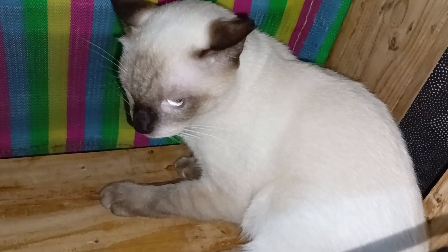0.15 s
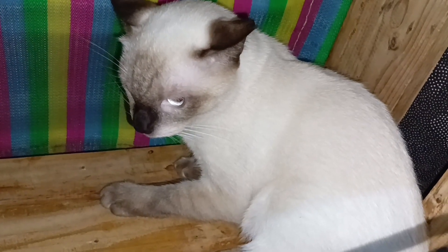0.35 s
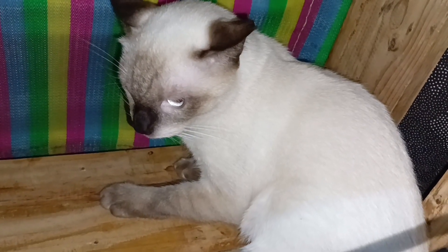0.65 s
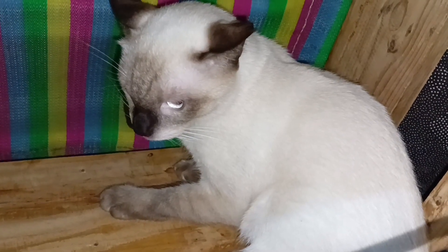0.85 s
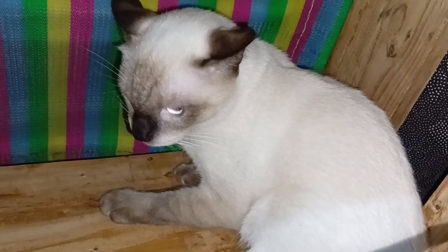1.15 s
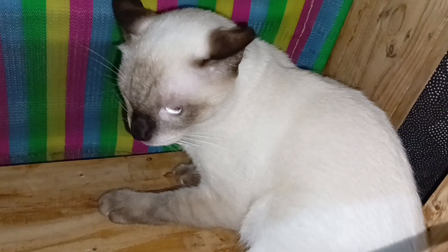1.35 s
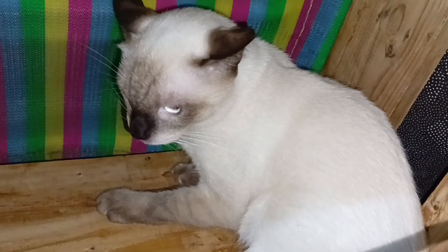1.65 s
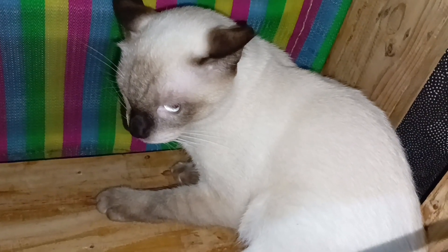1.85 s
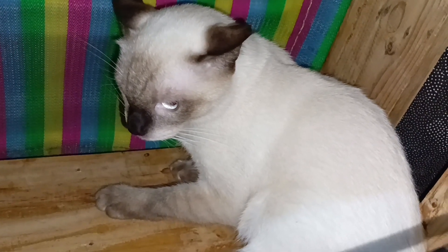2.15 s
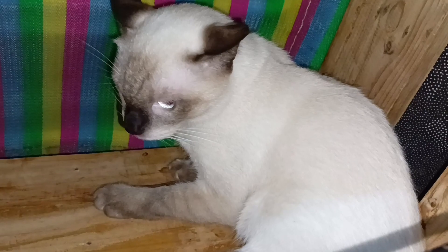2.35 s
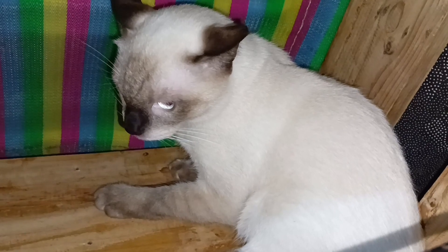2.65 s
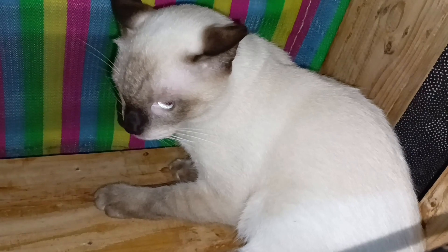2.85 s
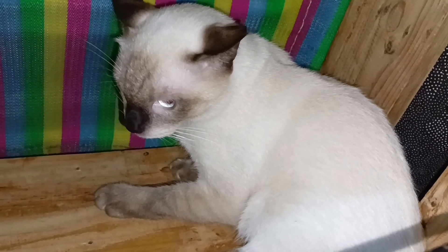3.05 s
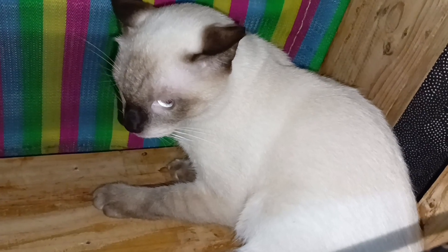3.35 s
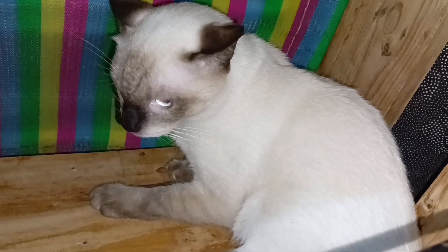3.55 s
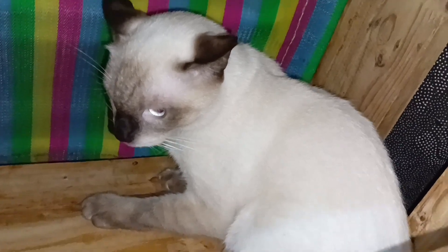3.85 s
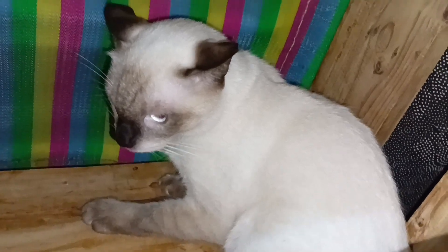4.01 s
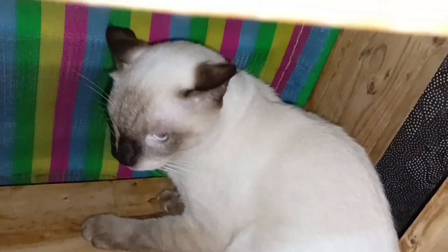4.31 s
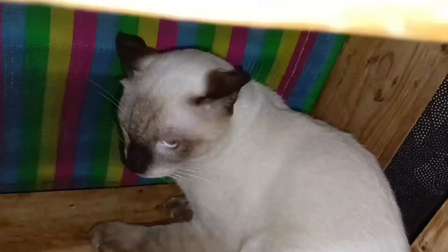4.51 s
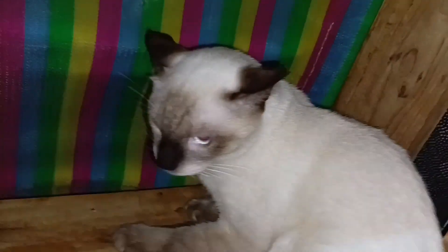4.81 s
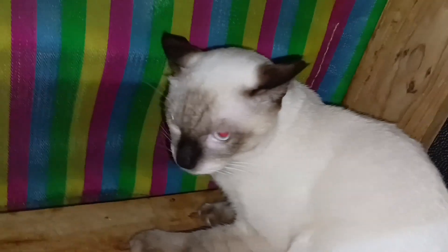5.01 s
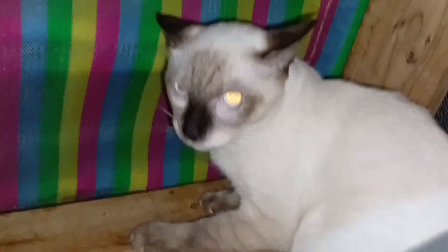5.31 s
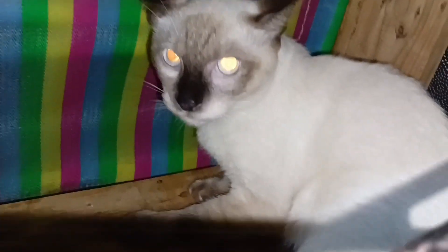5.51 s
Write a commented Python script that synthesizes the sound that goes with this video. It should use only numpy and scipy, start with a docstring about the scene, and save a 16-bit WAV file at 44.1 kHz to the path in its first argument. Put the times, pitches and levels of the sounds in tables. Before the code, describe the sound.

A quiet indoor space with a steady low hum and dull room noise; faint, blurred bird chirps far away. Small dry ticks of mouth, fur and wood are scattered throughout. From about 0.3 s a cat close to the microphone makes a low fluttering grumble. Between 0.55 and 1.1 s a brief, uneven, rasping hiss spits past the teeth, with a soft padded thump on wood at its start. At 1.1 s a long throaty growl begins, dark and buzzing, swelling fast, rising slightly until about 2.3 s, then sinking and stopping near 2.9 s. Hoarse distant squawks come between 1.5 and 4 s. The pause holds only room, birds and small knocks around 3.7-3.8 s. At 4.6 s a rougher, rattling, breathy growl starts, a sharp click at 4.8 s, and it climbs steeply, getting clearer and louder, into a yowl by 5.6 s.

```python
"""A wooden bench in a humming room, with an angry cat close to the microphone and birds far off.
A low grumble (a fluttering sine), a hiss (coloured noise) and a soft thump (bench modes) come first.
Then a long growl, and a shorter one that rattles and climbs into a yowl: both are uneven harmonics
of the vocal folds with random pulses and breath noise. Noise bursts make the ticks of mouth and bench;
the birds are hoarse resonant squawks and gliding sines."""
import sys
import numpy as np
from scipy import signal
from scipy.fft import rfft, irfft
from scipy.io import wavfile

SR = 44100
rng = np.random.default_rng(int(sys.argv[2]) if len(sys.argv) > 2 else 0)


def transcribe(signal):
    """Save signal, clipped to [-1, 1], as a 16-bit WAV file at the path in sys.argv[1]."""
    frames = np.atleast_2d(signal).T
    limited = np.clip(frames, -1, 1)
    pcm = np.round(limited * 32767).astype(np.int16)
    wavfile.write(sys.argv[1], SR, pcm)


N = 250047

# room background colour: (frequency [Hz], relative level [dB per Hz])
ROOM_COLOUR = [(18, -62), (30, -20.5), (108, 2.5), (163, -18), (191, -10), (407, -16.5), (502, -16.5),
               (557, -18.5), (802, -20.5), (989, -21.5), (1100, -23), (2050, -25), (3740, -35.5),
               (5670, -37), (15300, -50)]
# harsh distant bird calls, level before the birds' common boost: (time [s], length [s], level [dB],
# base pitch [Hz], main resonance [Hz], low resonance before a 1.5 dB lift [dB], hoarseness [0-1])
SQUAWKS = [(1.467, 0.119, -40, 917, 1850, -14, 0.39), (2.316, 0.068, -40, 723, 2080, -4, 0.77),
           (2.791, 0.098, -41, 782, 2077, -2, 0.72), (3.218, .11, -50, 801, 2230, 1.5, 0.69),
           (3.558, .037, -63, 754, 2300, -6, 0.4), (3.611, 0.041, -55.5, 808, 2320, -5, .4),
           (3.935, 0.034, -56.5, 660, 2000, -14, 0.9)]
# thin distant bird notes, level before the birds' common boost:
# (time [s], length [s], level [dB], middle pitch [Hz], glide [factor, above 0 up, below 0 down])
CHIRPS = [(0, 0.097, -63, 6140, -1.03), (1.796, 0.095, -52.5, 4507, 0.87), (1.84, .13, -54.5, 6150, -0.96),
          (2.351, 0.144, -49, 6040, 0.81), (3.08, .24, -62, 5760, -0.88), (3.068, .14, -67, 4950, 0.94),
          (3.759, .2, -65, 5600, 0.94), (4.428, 0.066, -63.5, 4400, 1), (4.456, 0.12, -63, 5880, -1.3)]
# ticks and scuffs of mouth and bench, played 10 dB below the listed level:
# (time [s], level [dB], centre [Hz], width [octaves], rise [s], t60 [s])
TICKS = [(0.207, -36.5, 3240, 1.4, .005, 0.043), (.245, -37.5, 7250, 0.66, .001, .03),
         (0.355, -42.5, 3700, .9, 0.0076, 0.25), (.51, -30, 4970, 0.73, .0006, 0.0082),
         (.56, -29, 1210, 0.47, .008, 0.14), (.565, -38.5, 5300, .2, .007, .031),
         (.763, -29.5, 4120, .2, .001, .028), (.788, -30, 8260, .45, .001, .03),
         (.82, -35, 6000, .57, .0035, .053), (.845, -30, 3970, 0.21, .002, 0.026),
         (.903, -25.5, 920, 0.96, .012, .15), (1.245, -25.5, 10100, 1.2, .004, 0.11),
         (1.48, -26.5, 4800, 1.5, 0.0048, 0.13), (2.37, -27.5, 7900, 1.3, 0.0034, .041),
         (3.705, -26.5, 1190, 1.45, .001, 0.015), (3.768, -33.5, 1200, 1.6, 0.0017, 0.11),
         (3.81, -24.5, 119, 0.14, .012, 0.089), (4.144, -35, 4300, 2.1, 0.0025, 0.058),
         (4.332, -33.5, 350, 0.62, 0.0014, 0.031), (4.822, -25, 7300, 0.28, .002, .037),
         (4.827, -16.5, 2550, 1.15, 0.0018, .028), (5.092, -23, 4474, 0.96, 0.004, .03)]
# low grumble before the first growl, played 0.5 dB above the listed level: (time [s], level [dB])
GRUMBLE = [(0.25, -63), (0.276, -51), (0.534, -37), (0.646, -30), (0.796, -37.5), (1.12, -33.5)]
# the hiss, before the trims in hiss(): (time [s], throat noise [dB], noise at the teeth [dB])
HISS = [(0.53, -71, -65), (0.56, -50, -59), (0.568, -43, -52), (0.634, -45.5, -54.5), (0.758, -48.5, -64),
        (0.762, -50, -55), (0.826, -42, -48.5), (0.878, -46, -57), (0.914, -43.5, -47.5),
        (1.04, -45, -43.5), (1.07, -50, -58), (1.12, -53, -62)]
# colour of the hiss: (frequency [Hz], relative level [dB per Hz])
HISS_COLOUR = [(180, -1.5), (300, -11.5), (378, 0), (460, -3.5), (560, -10), (694, -7), (818, -9),
               (1100, -9.5), (1580, -14.5), (1830, -13.5), (3540, -19.5), (4240, -18), (5250, -23.5),
               (10800, -30.5), (15300, -34)]
# resonances of the open mouth in the hiss: (frequency [Hz], width [Hz], added gain [dB])
JAWS = [(4400, 340, -10), (7300, 1300, -3), (12600, 2300, 3)]
# modes of the bench under the thump, played 10 dB below the listed level:
# (frequency [Hz], level [dB], rise [s], t60 [s])
BENCH = [(215, -11.5, 0.056, 0.108), (435, -16.5, 0.029, 0.045), (625, -20, 0.0025, 0.1),
         (1063, -29.5, 0.024, 0.14), (1342, -31, 0.019, 0.1), (1610, -51, 0.023, .09)]
# passing whistles of nose and mouth:
# (time [s], length [s], level [dB], start [Hz], end [Hz], width [Hz])
WHISTLES = [(4.48, 0.18, -58, 1900, 1600, 59), (4.78, 0.35, -44, 7600, 6990, 1700),
            (4.74, 1.3, -47, 1700, 1740, 70), (0.918, 0.15, -50, 4130, 4400, 320)]
# the two calls: (time [s], pitch [Hz], effort [dB])
GROWL = [(1.1, 119.2, -35.5), (1.18, 127.5, -20), (1.458, 143.2, -13.5), (1.56, 153.1, -11),
         (1.626, 156.4, -12), (1.656, 154.5, -12.5), (1.794, 166.7, -14.5), (2.022, 173.2, -16),
         (2.164, 173, -16), (2.214, 175.6, -16), (2.33, 177.1, -18), (2.402, 170.8, -15.5),
         (2.432, 163.9, -17.5), (2.574, 152.3, -15), (2.696, 140.6, -17), (2.818, 137.9, -17),
         (2.884, 127.3, -19.5), (2.92, 124.3, -38.5)]
YOWL = [(4.59, 155.8, -47), (4.642, 153.9, -25), (4.73, 173.8, -26.5), (4.792, 172.6, -21),
        (4.822, 177.1, -23.5), (4.95, 177.5, -19), (5.116, 204, -17.5), (5.242, 214.6, -10.5),
        (5.302, 229.2, -9), (5.448, 249.3, -9), (5.536, 286.1, -11.5), (5.6, 360.3, -14),
        (5.63, 368.3, -21), (5.66, 349.2, -12)]
# state of the vocal folds; pressing weakens the fundamental: (time [s], roughness [0-1], press [dB])
GROWL_FOLDS = [(1.24, 0.11, -4.5), (1.31, .11, 1), (1.479, 0.25, -0.5), (1.619, .18, -1), (2.299, 0.27, 2),
               (2.55, .18, 1.5), (2.791, 0.21, 3.5), (2.869, .24, 10.5)]
YOWL_FOLDS = [(4.65, 0.23, -4), (4.72, 0.29, -1), (4.82, .54, 2), (4.959, .44, 8), (5.12, 0.44, 1.5),
              (5.3, .15, 0), (5.601, 0.084, 0.5)]
# throat response, sharing the effort between the two lowest harmonics: (frequency [Hz], gain [dB])
GROWL_THROAT = [(125, 1), (152, 0.5), (175, -8.5), (250, -3), (278, 1), (350, -2)]
YOWL_THROAT = [(150, 1.5), (180, 2.5), (245, -6), (300, 3), (360, -5), (490, -10.5), (570, -5), (720, -17)]
# colour of the overtones of each call: (frequency [Hz], relative level [dB])
GROWL_OVERTONES = [(380, -4), (450, -7), (530, -3), (610, -12), (700, -6.5), (860, -21), (1020, -44),
                   (1240, -20), (1500, -38)]
YOWL_OVERTONES = [(450, 7), (530, 15.5), (600, -8), (700, 0.5), (790, -5), (900, -10), (1050, -11.5),
                  (1230, -5.5), (1450, -13.5), (1800, -45)]
# colour of the uneven pulses: (frequency [Hz], relative level [dB])
RATTLE = [(40, -35), (70, -17), (110, -12.5), (155, -11.5), (230, 5.5), (350, 2.5), (430, -23), (540, 2.5),
          (620, -23.5), (740, -7), (950, -33.5), (1500, -71)]
# air through the nearly shut mouth: (frequency [Hz], relative level [dB per Hz])
GROWL_AIR = [(530, -22), (900, -7.5), (1030, -3), (1220, -6.5), (1550, -8), (2090, -10), (2650, -5.5),
             (3430, -16), (3820, -9.5), (4670, -18.5), (6750, -18.5), (7870, -19.5), (10600, -26.5),
             (12600, -16), (15300, -26.5)]
YOWL_AIR = [(530, -56), (900, 6), (1050, -12), (1210, -8), (1430, -10), (1830, -4), (2060, -9.5),
            (2620, -7), (3350, -14), (3600, -14), (5850, -19.5), (7690, -21), (10500, -30), (12400, -17.5),
            (15300, -31)]
# narrow resonances of mouth and nose: (frequency [Hz], width [Hz], added gain [dB])
NOSE = [(1240, 63, 6.5), (1812, 27, -1), (2760, 310, -9), (3680, 100, -15.5), (5370, 170, -2.5),
        (6670, 170, 2.5)]

TIME = np.arange(N) / SR
BINS = np.fft.rfftfreq(N, 1 / SR)
ROOM_DB, HUM_DB, HUM_HZ = -47, -51, 115.4
# birds too far to tell apart; level before the birds' common boost
FAR_NOTES_PER_S, FAR_NOTE_DB, FAR_NOTE_S = 8.8, -81.5, .17
FAR_LOW_HZ, FAR_HIGH_HZ = 2800, 7400
SQUAWK_WIDTH_HZ = 1100  # width of the main resonance in a fully hoarse call
CHIRP_GLIDE = 0.066  # share of its pitch that a note slides when its glide factor is 1
FIDGETS_PER_S, FIDGET_DB, FIDGET_T60_S = 14, -58, .03  # average rate; each level varies at random
GRUMBLE_HZ = 99.5
TREBLE_HZ = 3400  # hiss below this comes from the throat, above it from the teeth
THUMP_S = .55
EASY_HZ = 154.2  # a relaxed pitch; above it the folds tighten and the jaw opens
FULL_DB = -14  # the effort of a full growl
# the whistle at the teeth sinks as the jaw opens
TEETH_HZ, TEETH_WIDTH_HZ, TEETH_SAG_HZ_PER_OCTAVE = 12360, 560, 1150
TEETH_SWELL_DB = 17  # how far that whistle rises from the ends of a call to its middle
MIC_LOW_HZ = 48  # the small microphone loses the deep bass
EDGE_HZ = 15550  # upper band limit


def amp(db):
    """Decibels to gain."""
    return 10 ** (np.asarray(db) / 20)


def unit(x):
    """Scales to rms 1."""
    return x / np.sqrt(np.mean(x ** 2) + 1e-20)


def read(points, hz):
    """Gain of a short spectrum at any frequency, drawn straight over log frequency."""
    f, db = np.transpose(points)
    return amp(np.interp(np.log(hz + 1), np.log(f + 1), db))


def curves(rows):
    """A soft gate over the span of a table and just past it, then its columns at every sample."""
    s, *columns = np.transpose(rows)
    inside = np.minimum(TIME - s[0], s[-1] + .025 - TIME)
    gate = np.clip(inside / .008, 0, 1)
    return [gate] + [np.interp(TIME, s, c) for c in columns]


def colour(x, gain):
    """Filters by a gain per frequency; rms 1."""
    return unit(irfft(rfft(x) * gain, N))


def noise():
    """White noise."""
    return rng.standard_normal(N)


def wander(hz):
    """Smooth random drift with speeds up to about hz; rms 1."""
    return colour(noise(), 1 / (1 + (BINS / hz) ** 4))


def resonate(x, hz, width):
    """A resonance of gain 1 that follows the curve hz."""
    turn = np.exp(2j * np.pi * np.cumsum(hz * np.ones(N)) / SR)
    r = np.exp(-np.pi * abs(width) / SR)
    # shift the band down to zero, smooth it there, shift it back
    smooth = signal.lfilter([1 - r], [1, -r], x / turn + 1e-18)
    return 2 * (turn * smooth).real


def whistle(hz, width):
    """A narrow band of air noise, resonated twice; rms 1."""
    return unit(resonate(resonate(noise(), hz, width), hz, width))


def peaks(rows, hz):
    """Summed gain of bell-shaped resonances (frequency [Hz], width [Hz], gain [dB])."""
    return sum(amp(db) / (1 + (2 * (hz - f) / width) ** 2) for f, width, db in rows)


def causal(gain):
    """The same gains with the phase lag of a real resonator: it rings after the blow."""
    log_gain = np.log(np.r_[gain, gain[:0:-1]])
    return np.exp(np.conj(signal.hilbert(log_gain)))[:len(gain)]


def add(mix, s, sound):
    """Mixes a sound in at time s."""
    part = mix[max(0, round(s * SR)):][:len(sound)]
    part += sound[:len(part)]


def echoes(x, t60):
    """A diffuse noise tail of energy 1 after a 4 ms gap."""
    t = TIME[:SR // 2]
    tail = rng.standard_normal(len(t)) * amp(-60 * t / t60) * (t > .004)
    return signal.fftconvolve(x, tail / np.linalg.norm(tail))[:N]


def boards(x):
    """Reflections off the boards close by ripple the treble."""
    out = x.copy()
    for delay_s, db in [(.0007, -22), (.0019, -33), (.0043, -16.5)]:
        add(out, delay_s, amp(db) * x)
    return out


def room():
    """Steady coloured noise with a low hum made of narrow-band noise."""
    background = colour(noise(), read(ROOM_COLOUR, BINS))
    return amp(ROOM_DB) * background + amp(HUM_DB) * whistle(HUM_HZ, 22)


def chorus():
    """Very faint gliding bird notes at random times and pitches."""
    out = np.zeros(N)
    u = np.linspace(0, 1, int(FAR_NOTE_S * SR))
    warble = wander(300)
    for when, height, slope in rng.random((int(FAR_NOTES_PER_S * N / SR), 3)):
        start = int(when * (N - len(u)))
        bend = 1 + CHIRP_GLIDE * (slope - .5) * u + 0.026 * warble[start:][:len(u)]
        hz = FAR_LOW_HZ * (FAR_HIGH_HZ / FAR_LOW_HZ) ** height * bend
        note = np.sin(np.pi * u) * np.sin(2 * np.pi * np.cumsum(hz) / SR)
        add(out, when * N / SR, amp(FAR_NOTE_DB) * note)
    return out


def chirps():
    """Thin whistled notes: a wavering sine glides while it swells and fades."""
    out = np.zeros(N)
    for s, length, db, pitch, glide in CHIRPS:
        u = np.linspace(0, 1, int(length * SR))
        hz = pitch * (1 + glide * CHIRP_GLIDE * (u - .5)) * (1 + 0.028 * wander(360)[:len(u)])
        add(out, s, amp(db) * np.sin(np.pi * u) * np.sin(2 * np.pi * np.cumsum(hz) / SR))
    return out


def squawks():
    """Hoarse calls: unsteady harmonics and noise pass three throat resonances."""
    out = np.zeros(N)
    for s, length, db, pitch, peak, low_db, hoarse in SQUAWKS:
        u = np.linspace(0, 1, int(length * SR))
        bins = np.fft.rfftfreq(len(u), 1 / SR)
        hz = pitch * (1 + 0.0478 * wander(210)[:len(u)] + 0.0274 * np.sin(np.pi * u))
        phase = 2 * np.pi * np.cumsum(hz) / SR
        buzz = unit(sum(np.sin(k * phase) for k in range(1, 8)))
        drive = (1 - hoarse) * buzz + hoarse * rng.standard_normal(len(u))
        throat = [(840, 230, low_db + 1.5), (peak, hoarse * SQUAWK_WIDTH_HZ, 0), (3900, 1800, -15)]
        call = irfft(rfft(drive) * peaks(throat, bins), len(u))
        fade = signal.windows.tukey(len(u), .5) * amp(-5 * u)
        add(out, s, amp(db) * unit(call * fade))
    return out


def birds():
    """All bird calls, blurred by distance with a diffuse tail."""
    out = chorus() + chirps() + squawks()
    return amp(4.0) * out + amp(3.5) * echoes(out, t60=0.3)


def fidgets():
    """Tiny dry ticks of fur and claws on wood: random clicks, each a short decaying noise."""
    clicks = (rng.random(N) < FIDGETS_PER_S / SR) * amp(3 * rng.standard_normal(N))
    t = TIME[:SR // 10]
    ring = rng.standard_normal(len(t)) * amp(-60 * t / FIDGET_T60_S)
    return amp(FIDGET_DB) * signal.fftconvolve(clicks, ring)[:N]


def ticks():
    """Short dying noise bursts of mouth and bench, each in its own band."""
    t, out = TIME[:4096], np.zeros(N)  # every burst ends within 93 ms
    hz = np.fft.rfftfreq(len(t), 1 / SR) + 1
    for s, db, centre, octaves, rise, t60 in TICKS:
        band = 1 / (1 + (np.log2(hz / centre) / octaves) ** 2) ** 2
        burst = unit(irfft(rfft(rng.standard_normal(len(t))) * band))
        decay = amp(db - 10 - 60 * np.maximum(t - rise, 0) / t60)
        add(out, s, burst * np.minimum(t / rise, 1) * decay)
    return out


def grumble():
    """A low, nearly pure flutter in the closed throat: a sine of wandering strength."""
    gate, db = curves(GRUMBLE)
    flutter = np.sin(2 * np.pi * GRUMBLE_HZ * TIME) * (1 + 0.41 * wander(40))
    return gate * amp(db + 0.5) * unit(flutter)


def hiss():
    """Air rasps in the throat and spits past the teeth."""
    gate, throat_db, teeth_db = curves(HISS)
    shape = read(HISS_COLOUR, BINS) * (1 + peaks(JAWS, BINS))
    high = 1 / (1 + (TREBLE_HZ / (BINS + 1)) ** 8)
    throat = amp(throat_db + 1.5) * colour(noise(), shape * (1 - high))
    spit = 9 * noise() * (rng.random(N) < 200 / SR)  # tiny pops of saliva, about 200 a second
    teeth = amp(teeth_db - 2.0) * colour(noise() + spit, shape * high)
    return boards(gate * (throat + teeth) * amp(1.9 * wander(150)))


def thump():
    """A padded blow: the bench's modes swell and die."""
    t, out = TIME[:SR // 3], np.zeros(N)
    for hz, db, rise, t60 in BENCH:
        swell = np.minimum(t / rise, 1) * amp(db - 10 - 60 * np.maximum(t - rise, 0) / t60)
        add(out, THUMP_S, swell * np.sin(2 * np.pi * (hz * t + rng.random())))
    return out


def whistles():
    """Air finds a narrow gap: each whistle swells, glides and fades."""
    out = np.zeros(N)
    for s, length, db, start, end, width in WHISTLES:
        u = np.clip((TIME - s) / length, 0, 1)
        out += amp(db) * np.sin(np.pi * u) * whistle(start + (end - start) * u, width)
    return boards(out)


def harmonics(phase, hz, rough, press_db, throat, overtones, over_db, tighten_db, slip, lag):
    """Pitched beats of the folds: two strong harmonics under nine fluttering overtones."""
    rasp = slip * np.sqrt(abs(rough)) * wander(75.5)  # the instant of closure shifts from beat to beat
    # the throat shares the effort between two harmonics and makes the higher ones lag
    first, second = read(throat, hz) / amp(press_db), read(throat, 2 * hz)
    tone = first * np.cos(phase) + second * np.cos(2 * phase + rasp - lag)
    tone /= np.hypot(first, second)
    upper = 0
    for k in range(3, 12):
        wave = np.cos(k * (phase + rasp / 2) - lag * k * (k - 1) / 2)
        upper = upper + read(overtones, k * hz) * amp(1.96 * wander(29)) * wave
    # tighter folds are brighter, by tighten_db an octave
    bright_db = over_db + tighten_db * np.log2(hz / EASY_HZ) + .5 * press_db
    return tone + amp(bright_db) * upper


def rattling(turns):
    """Pulses of random size and sign, two a beat, fill the valleys between the harmonics; rms 1."""
    beats = np.diff(np.floor(2 * turns), prepend=0) * (rng.random(N) - .5)
    return colour(beats, causal(read(RATTLE, BINS)))


def breath(phase, limp, rough, air_colour, puff):
    """Turbulent air pulsing with the folds, coloured by mouth and nose; rms 1."""
    pulse = 1 + 0.16 * np.cos(phase) + puff * rough * limp
    puffs = noise() * pulse * amp(1.0 * wander(40))
    return colour(puffs, read(air_colour, BINS) * (1 + peaks(NOSE, BINS)))


def teeth_whistle(rows, octaves, teeth_db):
    """A thin whistle at the teeth that swells to the middle of the call."""
    spent = np.clip((TIME - rows[0][0]) / (rows[-1][0] - rows[0][0]), 0, 1)
    swell_db = TEETH_SWELL_DB * (np.sin(np.pi * spent) - 1.5)
    hz = TEETH_HZ - TEETH_SAG_HZ_PER_OCTAVE * np.maximum(octaves, 0)
    return amp(teeth_db + swell_db) * whistle(hz, TEETH_WIDTH_HZ)


def voice(rows, folds, throat, overtones, air_colour, over_db, tighten_db, air_db, leak_db, teeth_db,
          rattle_db, chest_db, jitter, slip, shimmer, triple, puff, lag):
    """Vocal folds beat unevenly and pulse the air; effort and roughness shape the layers."""
    gate, hz, effort_db = curves(rows)
    _, rough, press_db = curves(folds)
    effort = amp(effort_db)
    # slack folds: the period wanders, quickly and slowly
    turns = np.cumsum(hz * (1 + jitter * rough * wander(70) + .014 * wander(22))) / SR
    phase = 2 * np.pi * turns
    # when rough, the folds fall into a strong-weak-weak pattern
    limp = np.cos(phase / 3 + 1.1 * wander(3.7))
    tone = harmonics(phase, hz, rough, press_db, throat, overtones, over_db, tighten_db, slip, lag)
    tone *= np.sqrt(2) * effort * (1 + rough * (triple * limp + shimmer * wander(110)))
    rattle = amp(rattle_db) * rough * effort * rattling(turns)
    # air grows with effort, and rough folds leak more
    flow = amp(air_db + 0.7 * (effort_db - FULL_DB) + leak_db * rough)
    air = flow * breath(phase, limp, rough, air_colour, puff)
    air += effort * teeth_whistle(rows, np.log2(hz / EASY_HZ), teeth_db)
    # the chest shakes with the effort
    chest = amp(chest_db) * np.sqrt(effort) * whistle(99, 75)
    return gate * (tone + rattle + chest + boards(air))


def scene():
    """The cat up close, the birds far away."""
    growl = voice(GROWL, GROWL_FOLDS, GROWL_THROAT, GROWL_OVERTONES, GROWL_AIR,
                  over_db=-15.0, tighten_db=26, air_db=-44.0, leak_db=14, teeth_db=-37.0,
                  rattle_db=2.5, chest_db=-24, jitter=.07, slip=0.33, shimmer=0.08,
                  triple=0.19, puff=0.73, lag=0.362)
    yowl = voice(YOWL, YOWL_FOLDS, YOWL_THROAT, YOWL_OVERTONES, YOWL_AIR,
                 over_db=-28.5, tighten_db=5.5, air_db=-44.5, leak_db=26.5, teeth_db=-38.0,
                 rattle_db=3.5, chest_db=-27.0, jitter=.085, slip=1.0, shimmer=0.29,
                 triple=0.93, puff=0.3, lag=1.274)
    small = hiss() + thump() + ticks() + fidgets()
    cat = growl + yowl + grumble() + whistles()
    mix = cat + small + amp(-7) * echoes(small, t60=0.11) + birds() + room()
    return mix[None]


def record(dry):
    """The microphone's bass roll-off, then the band limit."""
    roll_off = signal.butter(3, MIC_LOW_HZ, "high", fs=SR, output="sos")
    dry = signal.sosfilt(roll_off, dry)
    band_limit = signal.firwin(511, EDGE_HZ, window=("kaiser", 9), fs=SR)
    return signal.oaconvolve(dry, band_limit[None], "same")


dry = scene()
out = record(dry)
transcribe(out)
```